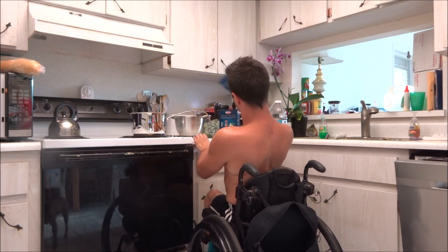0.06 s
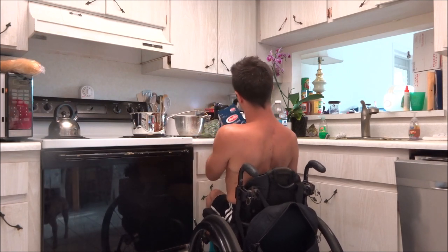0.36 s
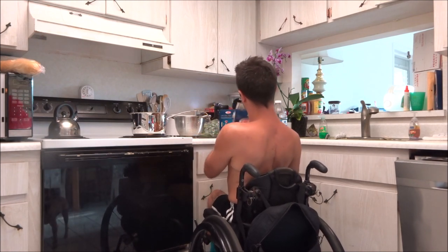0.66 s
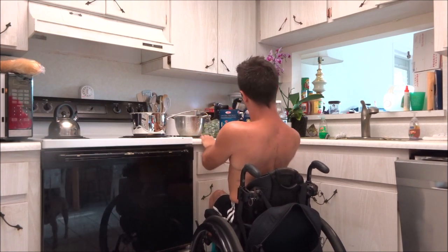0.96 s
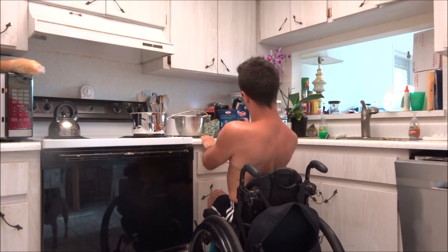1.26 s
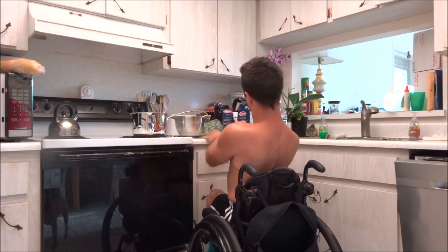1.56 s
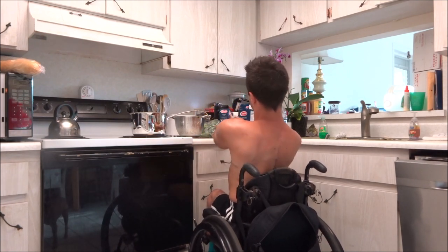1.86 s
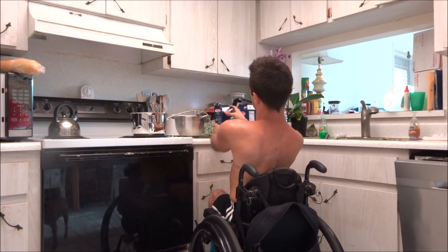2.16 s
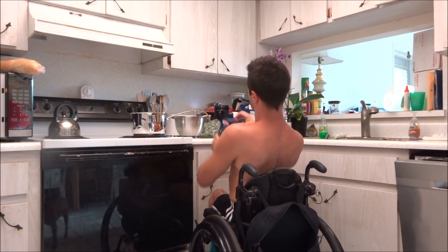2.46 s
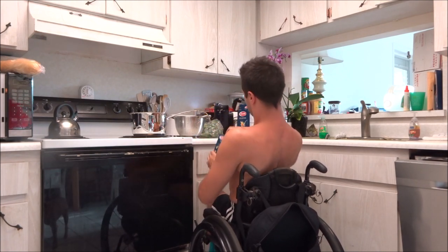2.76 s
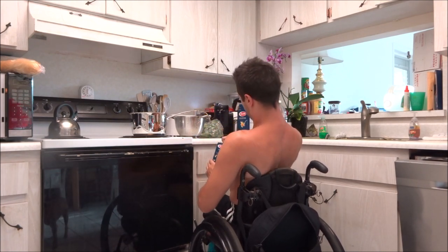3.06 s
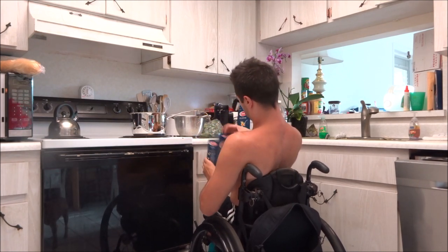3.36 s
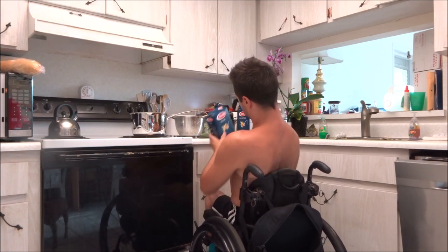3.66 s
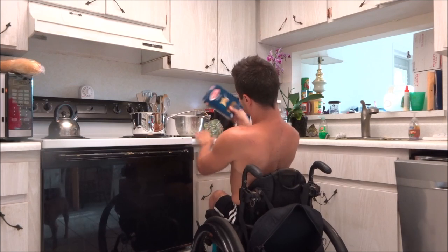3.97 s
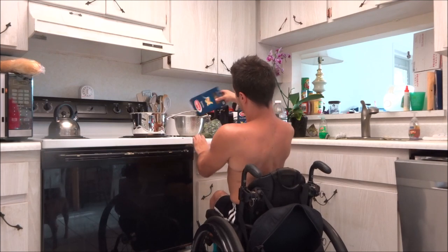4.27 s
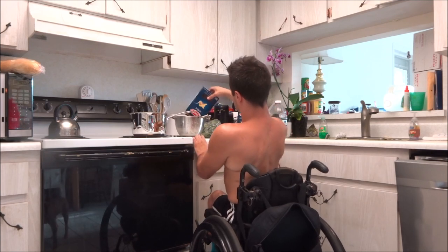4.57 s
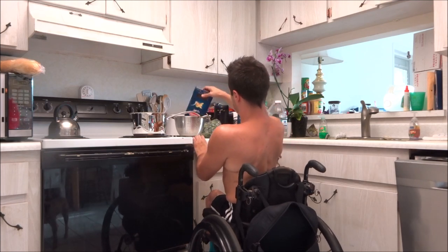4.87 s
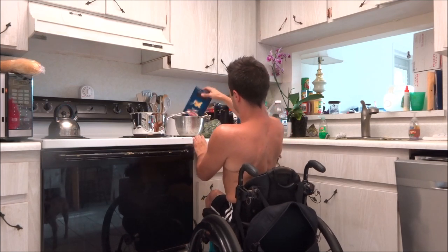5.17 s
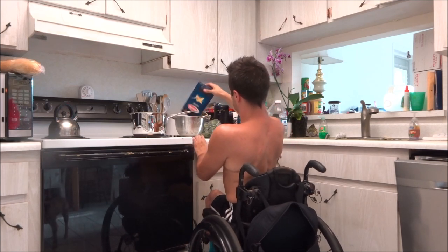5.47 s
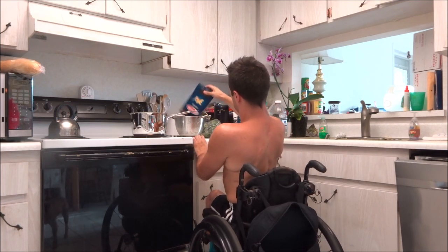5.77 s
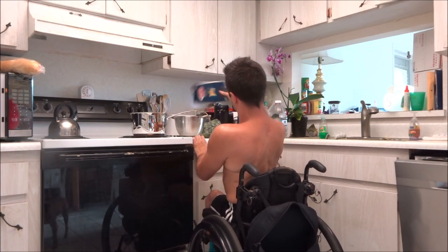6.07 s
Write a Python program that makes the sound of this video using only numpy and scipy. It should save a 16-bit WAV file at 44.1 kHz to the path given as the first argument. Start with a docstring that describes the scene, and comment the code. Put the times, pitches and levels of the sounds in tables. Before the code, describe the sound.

Heard from across a small, slightly echoing kitchen, a box of dry pasta bumps on the counter and rattles lightly while its cardboard flap is rubbed and pulled open in crisp snaps. After a louder shake, the pasta tumbles along the box in two surges and clatters brightly into a metal strainer. Some final pieces strike the steel, and the box is handled softly again over quiet room air and a faint cabinet rumble.

```python
"""A small, hard kitchen: a cardboard box of dry pasta is knocked about, opened and tipped into a strainer.
Fingers rub the card, the flap snaps, and each jolt rattles the load against a panel. The pieces slide
down the box in two main surges, rain on the ringing steel, and last clumps strike the bowl. The pasta is
a shower of tiny impacts coloured by the card or steel it hits. Under it a cabinet rumbles and the air
hushes. We listen from across the room, so most of the sound arrives by way of the walls."""
import sys
import numpy as np
from scipy import signal
from scipy.fft import rfft, irfft, next_fast_len
from scipy.io import wavfile
from scipy.ndimage import uniform_filter1d

SR = 44100
rng = np.random.default_rng(int(sys.argv[2]) if len(sys.argv) > 2 else 0)


def inscribe(sig):
    """Save sig as 16-bit PCM at rate SR to the path in sys.argv[1].

    A 1-D sig is mono; a 2-D sig holds one channel per row.
    Samples are clipped to [-1, 1] before scaling.
    """
    pcm = np.round(np.clip(np.atleast_2d(sig).T, -1, 1) * 32767)
    wavfile.write(sys.argv[1], SR, pcm.astype(np.int16))


N = 278712
TOP_HZ = 11150  # upper edge of the treble
EARLY_S, BLOW_S = 0.01, 0.05  # lead of the first loose pieces; span that a blow's level refers to
# the box turns hollow as it empties: (start [s], end [s])
EMPTYING_S = [4.5, 4.68]


def strainer(lip_db=-2.5, empty_s=5.73):
    """Pasta skitters thinly over the lip, then streams into the steel bowl; clumps land last."""
    # main stream, first spill, last dribble: (time [s], attack [s], hold [s], fade [dB/s], level [dB])
    streams = [(4.868, 0.26, 0.15, 71, -18), (4.962, 0.0077, 0.09, 297.5, -26),
               (5.557, 0.013, 0.015, 146, -35.5)]
    # clumps striking the steel: (time [s], level [dB], ring lift [dB], tilt [dB/octave])
    clumps = [(5.41, -20.5, 8, 1.5), (5.436, -21.5, 12, 0), (5.576, -34, -17, 9)]
    t = np.arange(N) / SR
    flow = sum(envelope(*stream) for stream in streams) * (t < empty_s)
    force = flow * contacts(200 + 1000 * flow / flow.max(), 8)
    landed = np.interp(t, [5.1, 5.118], [0, 1])
    lip = heard(force * np.sqrt(1 - landed), lambda f: steel(f, ring_db=5, tilt_db=11), count=2)
    bowl = heard(force * np.sqrt(landed), lambda f: steel(f, ring_db=0, tilt_db=1.5), direct=0.11, count=4)
    out = amp(lip_db) * lip + bowl
    for s, db, ring_db, tilt_db in clumps:
        clump = burst(0.011, 1800, lead_db=-43)
        strike = heard(clump, lambda f: steel(f, ring_db, tilt_db), direct=0.53, count=3)
        add(out, s - EARLY_S, amp(db) * strike)
    return out


def steel(hz, ring_db, tilt_db, width_hz=15):
    """Tone in dB of pasta on the strainer: the pieces' own clicks plus the bowl's narrow modes."""
    # ringing modes of the bowl: (frequency [Hz], level [dB])
    modes = [(1281, -6.5), (1800, 4), (1890, 2), (2003, -1), (2113, 1), (2315, -1.5), (3220, 1.5),
             (3415, 6), (3889, 7), (4032, 1.5), (4307, 1), (4543, -2), (4581, 6), (4840, 7.5), (5142, 3),
             (5222, -7), (5418, -12), (5739, -11), (6045, -1), (6266, -4), (6845, -6), (7063, -16),
             (7308, -13), (7790, -19)]
    # dry click of the pieces: (frequency [Hz], level [dB])
    clatter = [(40, -64), (110, -50), (200, -44), (380, -20), (1000, -15), (2800, -8), (3700, -6),
               (5200, 6.5), (6500, 1.5), (8000, 4.5), (8800, -5), (9600, 0), (11000, -6.5)]
    ring = sum(amp(db + ring_db) ** 2 * resonance(hz, centre, width_hz) for centre, db in modes)
    # the thin bowl radiates little below its lowest mode
    ring *= amp(along([(500, -53), (1200, 3.5)], hz)) ** 2
    tilt = tilt_db * np.log2(np.maximum(hz, 1700) / 4000)
    return 10 * np.log10(amp(along(clatter, hz)) ** 2 + ring) + tilt - 40 * (hz > TOP_HZ)


def slide():
    """The load tumbles down the box; more flow means denser impacts, and the later surge rings hollow."""
    # surges down the tipped box: (time [s], attack [s], hold [s], fade [dB/s], level [dB])
    surges = [(4.059, 0.12, 0.23, 87, -17), (4.671, 0.053, 0.14, 100, -33.5),
              (4.855, 0.011, 0.17, 700, -25), (5.13, 0.025, 0.15, 87, -36)]
    flow = sum(envelope(*surge) for surge in surges)
    force = flow * contacts(250 + 1800 * flow / flow.max(), 6.8)
    emptied = np.interp(np.arange(N) / SR, EMPTYING_S, [0, 1])
    full = heard(force * np.sqrt(1 - emptied), box, count=2)
    hollow = heard(force * np.sqrt(emptied), lambda f: box(f, emptying=True), count=2)
    return full + hollow


def box(hz, emptying=False):
    """Tone in dB of pasta hitting cardboard in this room; its peaks change level as the box empties."""
    # narrow resonances heard in the rattle, from the room and the box:
    # (frequency [Hz], width [Hz], lift when full [dB], lift when emptying [dB])
    resonances = [(475, 9.8, 2, 1.5), (480, 47, -3, -9.5), (685, 12, 6.5, 6), (831, 38, 6, 2),
                  (950, 86, 4.5, 1.5), (1295, 33, 1.5, 10.5), (1614, 40, 2.5, 2.5), (1930, 99, 3, 1),
                  (3290, 1040, 3.5, 3.5)]
    # broad colour of the rattle: (frequency [Hz], level [dB])
    rattle = [(35, -115), (60, -54.5), (222, -25.5), (466, -1), (579, -1), (690, -1), (753, -1.5),
              (1300, -2), (2850, -8.5), (3170, -10), (4030, -12), (7760, -16.5), (11000, -20),
              (14300, -131), (22000, -120)]
    peaks = [(centre, width, late if emptying else full) for centre, width, full, late in resonances]
    return along(rattle, hz) + lifts(peaks, hz)


def jolts():
    """Each jolt throws the pasta against one panel, where it rattles and settles."""
    # throws of the load: (time [s], level [dB], brightness [dB], rattle decay [s], panel note [Hz])
    throws = [(1.381, -40, -5, 0.015, 666), (1.497, -37.5, -5, 0.018, 550), (1.706, -39, -0.5, 0.0069, 580),
              (1.755, -39.5, -11.5, 0.012, 563), (1.92, -45, -7, 0.0069, 560),
              (2.018, -36.5, -6, 0.027, 1490), (2.128, -31.5, -4, 0.054, 380),
              (3.081, -18.5, 7.5, 0.03, 1100), (3.497, -37.5, -4, 0.025, 930), (3.728, -37.5, 0, 0.01, 626),
              (3.805, -40, 6.5, 0.0025, 3170), (4.072, -31.5, -1.5, 0.019, 830),
              (4.125, -22, -6.5, 0.006, 834), (4.18, -22, -8.5, 0.018, 685),
              (4.766, -27, -10, 0.0061, 1260), (4.848, -16, 3, 0.031, 1320), (4.893, -21, 7.5, 0.011, 1150),
              (5.005, -19, 6, 0.023, 1300), (5.036, -25.5, 16, 0.016, 710)]
    # colour of a jolt: (frequency [Hz], level [dB])
    tone = [(60, -4), (150, -5), (280, -1.5), (550, -2.5), (1100, -1.5), (1800, 2.5), (3500, 0.5),
            (6000, 0.5), (10000, -4)]
    # treble shelf: (frequency [Hz], share of the brightness [0-1])
    shelf = [(1800, 0.063), (5500, 0.94)]
    out = np.zeros((2, N))
    for s, db, bright_db, decay_s, note_hz in throws:
        colour = lambda f: along(tone, f) + bright_db * along(shelf, f) + panel(f, note_hz)
        out += blow(s, db, decay_s, colour, leftward=0.92)
    return out


def knocks():
    """The box meets the counter and one of its panels thumps."""
    # bumps on the counter: (time [s], level [dB], rattle decay [s], panel note [Hz])
    bumps = [(0.151, -64.5, 0.0066, 283), (0.27, -40, 0.028, 550), (0.531, -44, 0.02, 550),
             (0.879, -47, 0.011, 660), (0.977, -36.5, 0.01, 402), (2.733, -39, 0.0036, 830),
             (6.233, -38.5, 0.011, 690)]
    # bass-heavy colour of a knock: (frequency [Hz], level [dB])
    tone = [(60, 3), (150, 21), (280, 9.5), (450, 4.5), (800, -2.5), (1800, -2), (3200, -4), (5500, -1),
            (10000, -4)]
    return sum(blow(s, db, decay_s, lambda f: along(tone, f) + panel(f, note_hz), leftward=0.4)
               for s, db, decay_s, note_hz in bumps)


def snaps(decay_s=0.01):
    """The cardboard flap gives way in short, bright snaps."""
    # snaps of the flap: (time [s], level [dB])
    cracks = [(0.262, -57), (1.336, -54.5), (1.45, -51), (2.35, -42.5), (2.534, -45.5), (2.922, -38.5),
              (3.607, -40), (3.981, -45), (5.996, -53.5), (6.18, -57.5)]
    # crisp colour of a snap: (frequency [Hz], level [dB])
    tone = [(150, -2), (800, -3.5), (1800, 4), (3200, 7.5), (5500, 14), (10000, 18.5)]
    return sum(blow(s, db, decay_s, lambda f: along(tone, f), leftward=0.37) for s, db in cracks)


def panel(hz, note_hz, lift_db=7.5):
    """Lift in dB from a struck cardboard panel: one broad resonance around its note."""
    return lift_db * resonance(hz, note_hz, 0.25 * note_hz)


def blow(s, db, decay_s, colour, leftward):
    """One short rattle of the box at time s, tinted by colour(Hz) in dB."""
    tone = lambda f: box(f, emptying=s > EMPTYING_S[1]) + colour(f)
    rattle = heard(burst(decay_s, 2200), tone, direct=0.48, leftward=leftward, count=2)
    out = np.zeros((2, N))
    add(out, s - EARLY_S, amp(db) * rattle)
    return out


def handling():
    """Loose pieces shift in the box while fingers rub and pull at its flap."""
    # turns of the box that shift the pasta: (time [s], length [s], level [dB])
    shifts = [(0.3, 0.38, -63), (0.9, 0.06, -48.5), (0.955, 0.038, -46), (1.42, 0.074, -45),
              (1.8, 0.38, -55), (2.01, 0.32, -36), (2.4, 0.82, -48), (2.55, 0.35, -50), (3.2, 0.72, -48),
              (3.52, 0.11, -42), (4.01, 0.11, -36), (5.67, 0.042, -44.5), (5.85, 0.016, -46),
              (5.95, 0.55, -53)]
    # resonance of the upright box's broad side: (frequency [Hz], width [Hz], lift [dB])
    broad_side = [(380, 205, 2.5)]
    # finger strokes on the card: (time [s], length [s], level [dB])
    rubs = [(0.0, 0.0087, -57), (0.1, 0.14, -65), (0.8, 0.052, -61), (0.96, 0.03, -54), (1.21, 0.006, -59),
            (1.4, 0.21, -55.5), (2.03, 0.49, -49), (2.53, 0.33, -47), (2.95, 0.47, -53),
            (3.36, 0.057, -44.5), (3.63, 0.051, -49), (5.66, 0.054, -40)]
    # papery colour of the rubbing: (frequency [Hz], level [dB])
    rustle = [(300, -20), (1500, 8), (4000, 11), (7000, 8.5), (11000, 3)]
    upright = lambda f: box(f) + lifts(broad_side, f)
    pasta = heard(moves(shifts) * contacts(600, 4.4), upright, leftward=0.82, count=2)
    card = heard(moves(rubs) * contacts(700, 7.7), lambda f: along(rustle, f), leftward=0.13, count=3)
    return pasta + card


def squeak(s=3.979, hz=9010, width_hz=120, db=-30.5, decay_s=0.025):
    """A thin, high squeak as the box tips: tiny slips excite one narrow resonance."""
    note = lambda f: 20 * np.log10(resonance(f, hz, width_hz))
    slips = burst(decay_s, 1100, lead_db=-40)
    out = np.zeros((2, N))
    add(out, s - EARLY_S, amp(db) * heard(slips, note, direct=1.0, count=3))
    return out


def counter(knock_s=0.97, knock_db=-41):
    """The hollow cabinet under the counter rumbles when it is leant on, and booms at one knock."""
    # pushes against the counter: (time [s], length [s], level [dB])
    leans = [(0.85, 0.12, -53.5), (1.21, 0.037, -66), (3.1, 0.065, -52.5), (3.35, 0.04, -51.5),
             (3.99, 0.016, -53), (4.56, 0.035, -45.5), (4.77, 0.16, -41.5)]
    # cabinet resonances: (frequency [Hz], width [Hz], lift when leant on [dB], lift when knocked [dB])
    modes = [(167, 52, 3.5, 25), (238, 19, 5, -16), (410.5, 52, 9.5, 13), (654, 64, 5.5, 22),
             (787, 48, 9, 32.5)]
    # dull colour of the cabinet: (frequency [Hz], level [dB])
    rumble = [(30, -28), (100, -17.5), (140, -14.5), (210, 0), (280, 4), (400, -3), (900, -12.5),
              (3000, -71)]
    leant = lambda f: along(rumble, f) + lifts([(hz, width, db) for hz, width, db, _ in modes], f)
    knocked = lambda f: along(rumble, f) + lifts([(hz, width, db) for hz, width, _, db in modes], f)
    arm_weight = envelope(-1.16, attack_s=2.6, hold_s=N / SR, fade_db_per_s=0, db=-60.5)
    push = moves(leans) + arm_weight
    out = heard(push * contacts(900, 3.4), leant, direct=0.89, leftward=0.3, count=2)
    boom = heard(np.sqrt([BLOW_S * SR]), knocked, direct=1.8, leftward=0.3)
    add(out, knock_s, amp(knock_db) * boom)
    return out


def room(direct, leftward):
    """Stereo path from one spot in the kitchen: direct sound, slap off the near cabinets, tail."""
    # decay of the kitchen: (frequency [Hz], time to fall 60 dB [s])
    reverb_times = [(100, 0.4), (500, 0.48), (1500, 0.49), (5000, 0.39), (11000, 0.41)]
    # stereo image: (frequency [Hz], left-right likeness [0-1])
    likeness = [(100, 0.98), (500, 0.91), (1500, 0.81), (11000, 0.82)]
    # balance at the strainer, where leftward is 1: (frequency [Hz], left over right [dB])
    balance = [(300, -0.5), (1200, 1.5), (3500, 1.6), (11000, 1.5)]
    hz, t, noise = signal.stft(rng.standard_normal((2, SR // 2)), SR, nperseg=256)
    slap = 1 + 0.92 * np.exp(-t / 0.018)
    fade = amp(-60 * t / along(reverb_times, hz)[:, None])
    tail = signal.istft(noise * fade * slap, SR, nperseg=256)[1]
    tail /= np.linalg.norm(tail[0])
    tail[0, 0] += direct
    # the many reflections favour no broad band
    spectrum = rfft(tail)
    tail = irfft(spectrum / np.sqrt(uniform_filter1d(np.abs(spectrum) ** 2, size=70)))
    spread = lambda f: np.arccos(np.clip(along(likeness, f), -1, 1)) / 2
    mid, side = filtered(tail[:, :SR * 2 // 5], lambda f: np.array([np.cos(spread(f)), np.sin(spread(f))]))
    pair = np.array([mid + side, mid - side]) / np.linalg.norm(mid)
    return filtered(pair, lambda f: amp(np.outer([0.5, -0.5], leftward * along(balance, f))))


def hush(db=-66):
    """The steady air of the kitchen, wide and only slightly alike in both channels."""
    # room tone: (frequency [Hz], level [dB])
    tone = [(30, -32), (100, -12), (230, 5), (600, 16.5), (1500, 12), (3000, -3.5), (11000, 1.5)]
    air = rng.standard_normal(N) + 5.4 * rng.standard_normal((2, N))
    return amp(db) * unit(filtered(air, lambda f: amp(along(tone, f))))


def heard(force, tone, direct=0.31, leftward=1, count=1):
    """Impacts spread over count spots, sounding through a body of spectrum tone(Hz) and the room."""
    body = click(tone)[None]
    spot = rng.integers(count, size=len(force))
    paths = [signal.fftconvolve(room(direct, leftward), body, axes=1) for _ in range(count)]
    out = sum(signal.oaconvolve((force * (spot == k))[None], path, axes=1) for k, path in enumerate(paths))
    return out[:, :N]


def click(tone, size=8192):
    """One impact: a minimum-phase pulse of energy 1 shaped by tone(Hz) in dB."""
    cepstrum = irfft(np.log(amp(tone(np.fft.rfftfreq(size, 1 / SR)))))
    cepstrum[1:size // 2] *= 2
    cepstrum[size // 2 + 1:] = 0
    pulse = irfft(np.exp(rfft(cepstrum)))
    return pulse / np.linalg.norm(pulse)


def contacts(per_s, scatter_db, size=N):
    """Random impacts of uneven strength, rms 1."""
    chance = np.clip(per_s / SR, 1e-4, 1)
    strength = amp(scatter_db * np.clip(rng.standard_normal(size), -2, 2)) * rng.choice([-1, 1], size)
    return unit((rng.random(size) < chance) * strength / np.sqrt(chance))


def burst(decay_s, per_s, lead_db=-22):
    """A few pieces arrive EARLY_S ahead, then the whole load lands and settles; rms 1 over BLOW_S."""
    t = np.arange(SR // 5) / SR - EARLY_S
    landing = 1 - 0.82 * np.exp(-np.abs(t) / 0.0024)
    settling = np.exp(-np.abs(t) / decay_s)
    force = contacts(per_s, 8, size=len(t)) * np.where(t < 0, amp(lead_db), landing * settling)
    return force / np.linalg.norm(force) * np.sqrt(BLOW_S * SR)


def moves(rows, attack_s=0.044, fade_db_per_s=200):
    """Gain of a series of hand movements, each peaking at its time; their powers add."""
    gains = (envelope(s - attack_s, attack_s, length, fade_db_per_s, db) for s, length, db in rows)
    return np.sqrt(sum(gain ** 2 for gain in gains))


def envelope(s, attack_s, hold_s, fade_db_per_s, db, swell_db=23.5):
    """One gain per sample: silence, a swell, a hold, a steady fade."""
    t = np.arange(N) / SR - s
    rise = np.clip(t / attack_s, 0, 1)
    fade_db = fade_db_per_s * np.maximum(t - attack_s - hold_s, 0)
    return (t >= 0) * amp(db - swell_db * (1 - rise) - fade_db)


def resonance(hz, centre, width):
    """A bell curve: 1 at its centre, a half at the edges of its width."""
    return 1 / (1 + (2 * (hz - centre) / width) ** 2)


def lifts(peaks, hz):
    """Boost in dB from resonances (frequency [Hz], width [Hz], lift [dB])."""
    return sum(db * resonance(hz, centre, width) for centre, width, db in peaks)


def along(points, hz):
    """A curve through (frequency [Hz], value) points on a log axis."""
    f, v = np.transpose(points)
    return np.interp(np.log(hz + 1), np.log(f + 1), v)


def filtered(x, response):
    """Equalise x with the gain response(Hz)."""
    n = x.shape[-1]
    m = next_fast_len(n + SR // 4)
    return irfft(rfft(x, m) * response(np.fft.rfftfreq(m, 1 / SR)), m)[..., :n]


def add(track, s, x):
    """Mix x into the track from time s."""
    part = track[..., max(0, round(s * SR)):][..., :x.shape[-1]]
    part += x[..., :part.shape[-1]]


def amp(db):
    return 10 ** (np.asarray(db) / 20)


def unit(x):
    return x / np.sqrt(np.mean(x ** 2) + 1e-20)


def scene():
    """The box is handled, opened and poured out, over the cabinet's rumble and the room tone."""
    return handling() + knocks() + snaps() + jolts() + slide() + strainer() + squeak() + counter() + hush()


def record(dry):
    """A steep low-pass shuts off the treble above TOP_HZ."""
    return filtered(dry, lambda hz: 1 / np.sqrt(1 + (hz / TOP_HZ) ** 240))


dry = scene()
out = record(dry)
inscribe(out)
```